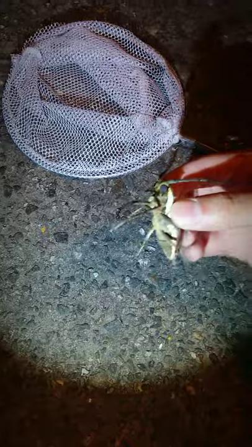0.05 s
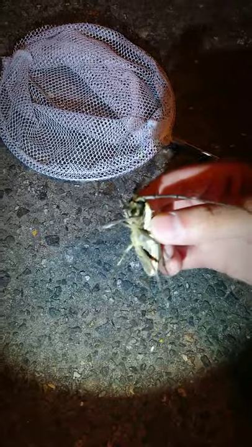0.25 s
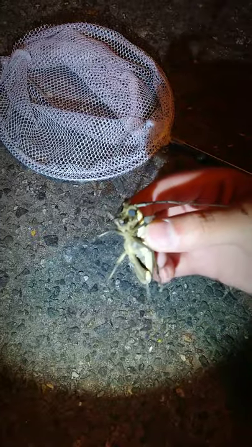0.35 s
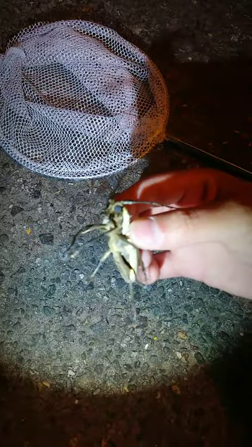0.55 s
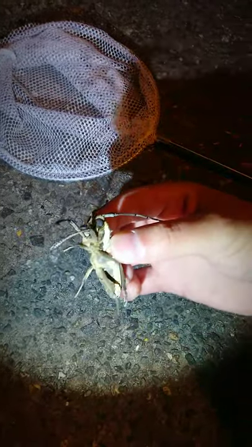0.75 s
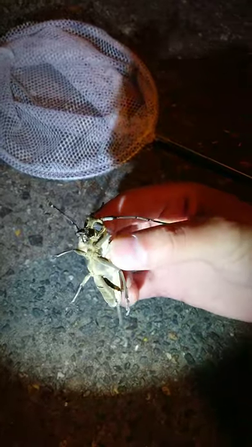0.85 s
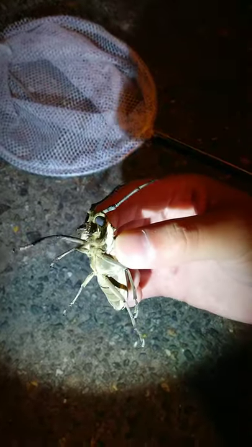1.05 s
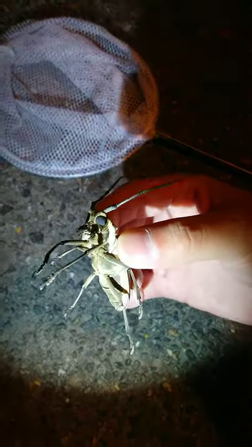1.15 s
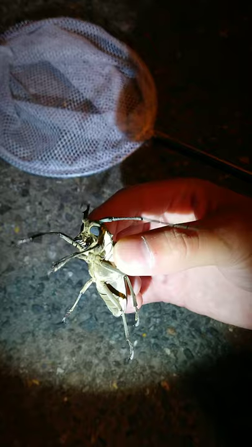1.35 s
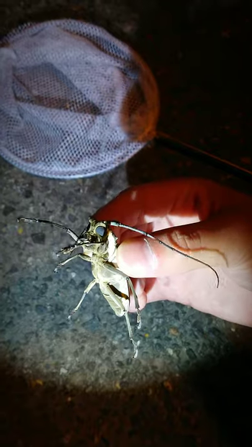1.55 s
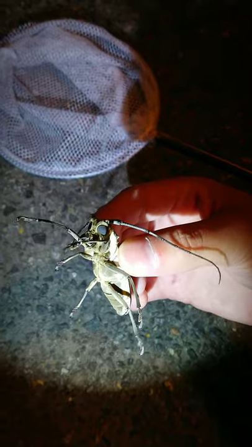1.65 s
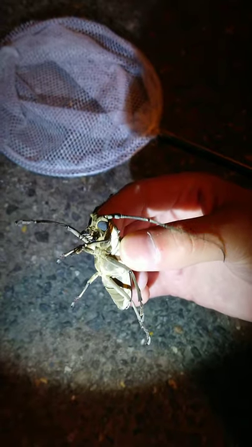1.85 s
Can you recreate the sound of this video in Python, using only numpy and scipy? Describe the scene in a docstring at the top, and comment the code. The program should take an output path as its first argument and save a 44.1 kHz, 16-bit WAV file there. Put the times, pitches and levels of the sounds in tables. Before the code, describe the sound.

A large hand-held beetle squeaks harshly close to the microphone. After soft handling bumps at the start, stuttering high chirps run from 0.1 to 0.5 seconds, then fuse into a rasp from 0.6 to 0.9. A quieter stutter follows from 1.0 to 1.4, a weaker rasp around 1.5, and a few faint ticks from 1.7 to 1.9. Low outdoor rumble and soft hiss continue throughout.

```python
"""A large beetle stridulates, held in the fingers close to a phone outdoors at night.
Its scraper sticks and slips over a ridged file: slow strokes stutter in separate chirping slips,
fast ones fuse into a rasp. Each slip rings the shell and echoes off the hand.
The phone is bumped softly over a low, steady background."""
import sys
import numpy as np
from scipy import signal
from scipy.fft import rfft, irfft
from scipy.io import wavfile
from scipy.ndimage import uniform_filter1d

SR = 44100
rng = np.random.default_rng(int(sys.argv[2]) if len(sys.argv) > 2 else 0)


def to_wav(sig):
    """Store sig (one row per channel, or 1-D mono) as 16-bit WAV at the path in sys.argv[1].

    Samples outside -1..1 are clipped; the rate is SR.
    """
    pcm = np.clip(np.atleast_2d(sig), -1, 1) * 32767
    pcm = np.round(pcm).astype(np.int16)
    wavfile.write(sys.argv[1], SR, pcm.T)  # frames by channels


N = 83790

# Slow-stroke slips: (time [s], level [dB], ridge rate [Hz], treble [dB], roughness [0-1])
SLOW_SLIPS = [(0.126, -18, 6800, -16.5, 0.13), (0.1568, -15.5, 6900, -9, 0.2),
              (0.184, -15, 6300, -5.5, 0.13), (0.2156, -11.5, 7500, 0, 0.27),
              (0.2347, -18.5, 3400, -12, 0.47), (0.256, -13.5, 7150, -1.5, 0.13),
              (0.302, -12, 7000, 6.5, 0.52), (0.316, -23, 3370, -8, 0.5), (0.344, -14, 7440, -5, 0.2),
              (0.376, -15, 8000, -5.5, 0.1), (0.3982, -13.5, 5660, 2, 0.6), (0.4167, -17, 5180, -7, 0.18),
              (0.4347, -15.5, 5300, -5, 0.16), (0.4479, -20, 3800, -15, 0.04),
              (0.4564, -20.5, 4480, -7, 0.13), (0.4676, -19, 5400, -5, 0.3),
              (0.4799, -19.5, 4160, -16, 0.27), (0.4928, -14.5, 5600, -1, 0.25),
              (0.5033, -20, 3400, -8, 0.36), (0.5151, -24, 3840, -17, 0.1), (0.537, -18.5, 5030, -7.5, 0.4),
              (1.0228, -29, 3350, -20, 0.56), (1.032, -22, 3350, -20, 0.25), (1.0403, -28, 3700, -18, 0.5),
              (1.057, -19.5, 3440, -3.5, 0.8), (1.0692, -22, 4220, -13, 0.23),
              (1.0876, -17, 4060, -9.5, 0.5), (1.0991, -20, 4400, -2, 0.3), (1.11, -20, 4440, -8, 0.17),
              (1.122, -20.5, 3650, -10, 0.45), (1.1447, -20, 4570, -7, 0.25), (1.1591, -25, 4000, -15, 0.6),
              (1.1841, -24.5, 3150, -17, 0.56), (1.198, -26.5, 4070, -7, 0.06),
              (1.203, -27, 5760, -11, 0.2), (1.2095, -24.5, 3120, -27, 0.6), (1.2192, -24, 3390, -4, 0.4),
              (1.226, -25, 4180, -17, 0.5), (1.2355, -20.5, 4200, -17, 0.86),
              (1.2467, -21.5, 3220, -4, 0.77), (1.2524, -24.5, 3900, -17, 0.6),
              (1.2638, -21.6, 4240, -13, 0.45), (1.2715, -22.5, 4350, -2, 0.37),
              (1.2764, -21, 4200, -10, 0.75), (1.282, -26, 3640, -13, 0.9), (1.288, -28.5, 5570, -25, 0.8),
              (1.305, -22.5, 3490, -8, 1), (1.317, -24, 4330, -9, 0.45), (1.3265, -24.5, 3200, -18, 0.7),
              (1.3357, -23.5, 3060, -7, 0.4), (1.344, -25, 3540, -16, 0.5), (1.351, -24.5, 5730, -4, 0.2),
              (1.355, -25.5, 2350, -19, 0.12), (1.3629, -28.5, 2290, -17, 0.05),
              (1.368, -32, 2240, -26, 0.6), (1.373, -29.5, 2340, -15, 0.16), (1.379, -31, 3060, -27, 0.6),
              (1.3585, -29, 2400, -18, 0.4), (1.384, -37, 2400, -26, 0.5), (1.6974, -39.5, 3220, -33, 0.5),
              (1.703, -44, 3300, -22, 0.8), (1.7088, -38.5, 2100, -31, 0.55), (1.8082, -36, 2500, -40, 0.6),
              (1.8152, -36, 2300, -42, 0.57), (1.8203, -35, 2280, -32, 0.5), (1.8288, -39, 2330, -37, 0.37),
              (1.839, -41, 2410, -31, 0.8), (1.8435, -43, 4100, -23, 0.5), (1.854, -36.5, 2150, -42, 0),
              (1.8922, -36, 2900, -42, 0.65)]
# Posture's effect on the shell, per stroke: (centre [Hz], width [Hz], gain [dB])
SLOW_POSTURES = [
    [(2050, 1320, -8), (3650, 350, 3), (4550, 280, -6), (6960, 410, -2.5), (10670, 620, -3.5),
     (13800, 630, 3), (16200, 600, 4)],
    [(1950, 250, -2), (2780, 69, -4), (3250, 200, 2), (4270, 230, 6), (6750, 1500, -2.5), (11100, 400, 3),
     (13400, 800, 2), (16000, 700, 6)],
]
def slow_strokes(slip_s=0.0015, gain_db=-1.36, second_stroke_s=1.0):
    """Two slow strokes of the scraper: each slip is a separate chirp."""
    strokes = np.zeros((2, 2, N))
    for time_s, level_db, ridge_hz, treble_db, roughness in SLOW_SLIPS:
        gain = amp(level_db + gain_db) * np.sqrt(SR * slip_s / 2)
        chirp = slip(slip_s, ridge_hz, treble_db, roughness, random_contact())
        add_slip(strokes[int(time_s > second_stroke_s)], time_s, gain * chirp)
    return sum(shell(stroke, posture) for stroke, posture in zip(strokes, SLOW_POSTURES))


# Scraper pace, per stroke: (time [s], slip rate [Hz])
FAST_RATES = [
    [(.577, 220), (.586, 376), (.61, 387), (.635, 450), (.70, 448), (.745, 478), (.80, 432), (.84, 357),
     (.88, 198)],
    [(1.487, 1170), (1.53, 1300), (1.543, 770), (1.556, 550), (1.58, 470), (1.60, 310), (1.62, 215),
     (1.64, 120)],
]
# Scraper pressure, per stroke: (time [s], level [dB], treble [dB], ridge rate [Hz])
FAST_PRESSURES = [
    [(.577, -37.5, -10.5, 5460), (.61, -33.5, -8, 5500), (.71, -33, -8.5, 4500), (.81, -36, -12.5, 3700),
     (.88, -46, -26, 3434)],
    [(1.487, -53.5, -22, 2400), (1.52, -43, -22, 3870), (1.572, -42, -15, 4140), (1.64, -52, -15, 3300)],
]
# Grain, per stroke: (gain [dB], treble offset [dB], roughness [0-1])
FAST_GRAINS = [(3.2, 7, 0.72), (3.2, -12.5, 0.81)]
# Posture's effect on the shell, per stroke: (centre [Hz], width [Hz], gain [dB])
FAST_POSTURES = [
    [(2030, 100, 4), (3480, 50, 5), (3610, 45, 5), (3820, 45, 6), (4450, 50, 5), (4980, 140, -4),
     (5450, 60, 4), (6020, 60, 5), (6500, 130, -6), (7080, 50, 4)],
    [(1500, 130, -4), (2350, 130, 5), (2720, 81, -2), (3130, 90, 4), (3700, 110, -7), (4120, 200, 6),
     (4620, 130, 6), (5050, 200, -4)],
]
def fast_stroke(rates, pressure, grain, posture, slip_s=0.00119, memory=0.62, spacing_jitter=0.018):
    """Similar slips crowd into a rasp at speed and part again as the scraper slows."""
    out = np.zeros((2, N))
    rate_times_s, rates_hz = np.transpose(rates)
    pressure_times_s, *curves = np.transpose(pressure)
    gain_db, treble_offset_db, roughness = grain
    time_s, contact = rate_times_s[0], random_contact()
    while time_s < rate_times_s[-1]:
        slip_hz = np.interp(time_s, rate_times_s, rates_hz)
        level_db, treble_db, ridge_hz = (np.interp(time_s, pressure_times_s, curve) for curve in curves)
        contact = memory * contact + np.sqrt(1 - memory ** 2) * random_contact()
        chirp = slip(slip_s, ridge_hz, treble_db + treble_offset_db, roughness, contact)
        add_slip(out, time_s, amp(level_db + gain_db) * np.sqrt(SR / slip_hz) * chirp)
        time_s += np.exp(spacing_jitter * rng.standard_normal()) / slip_hz
    return shell(out, posture)


def random_contact(ridges=20, size=2048):
    """Chance in one slip: how each ridge is met, then noise for the scatter."""
    return rng.standard_normal((2, ridges + size))


def slip(length_s, ridge_hz, treble_db, roughness, contact, ridges=20, size=2048):
    """The scraper jumps a few ridges, one tick each. Stereo, unit mean energy."""
    jitter, speed_up, flattening = 0.28, 0.064, 0.53
    shelf_hz, body_cutoff_hz = 7600, 1390  # so small a body radiates little bass
    hz = np.fft.rfftfreq(size, 1 / SR)
    timing_noise, force_noise = contact[:, :ridges]
    ridge_s = (np.arange(ridges) + 0.5) / ridge_hz
    progress = np.minimum(ridge_s / length_s, 1)
    struck = progress < 1
    force = np.sin(np.pi * progress ** 0.76) ** 2 * np.exp(0.85 * roughness * force_noise)
    tick_s = (ridge_s + jitter * roughness * timing_noise / ridge_hz) * (1 + speed_up * (1 - progress))
    ticks = force[struck] @ np.exp(-2j * np.pi * np.outer(abs(tick_s[struck]), hz))
    spectrum = ticks * (1 + scatter(contact[:, ridges:]))
    smooth_power = uniform_filter1d(abs(spectrum) ** 2, size=41, axis=1) + 1e-3
    shelf = amp(treble_db / (1 + (shelf_hz / (hz + 1)) ** 2.08))
    chirp = irfft(spectrum * shelf / smooth_power ** (flattening / 2))
    chirp = np.roll(chirp, size // 64, axis=1) * np.linspace(1, 0, size)
    chirp = signal.sosfilt(signal.butter(2, body_cutoff_hz, "high", fs=SR, output="sos"), chirp)
    return chirp / np.sqrt((chirp ** 2).sum() / 2 + 1e-20)


def scatter(noise, near_decay_s=0.0017, near_db=-0.5, far_decay_s=0.029, far_db=-26):
    """Spectrum of diffuse echoes: near in the shell and hand, far in the surroundings."""
    t = np.arange(noise.shape[1]) / SR
    near = amp(near_db) * unit_rms(np.exp(-t / near_decay_s))
    far = amp(far_db) * unit_rms(np.exp(-t / far_decay_s))
    return rfft(noise * (near + far) / np.sqrt(len(t)))


# Shell response at the microphones: (frequency [Hz], relative left [dB], relative right [dB])
SHELL_RESPONSE = [(300, -41, -55), (990, -24.5, -20), (1606, -28, -14), (2124, -30, -1.5),
                  (2420, -22, -4.5), (2790, -23, -8.5), (3210, -19, -3), (3670, -18, 0), (4155, -17, -2.5),
                  (4720, -6, -9.5), (4950, -12, -3.5), (5050, -9, -11.5), (5690, -2.5, -2),
                  (6200, -13.5, -9), (7230, -9.5, -0.5), (7900, -8.5, -6), (8400, -10, -16.5),
                  (9150, -22, -17.5), (9670, -9, -10), (10440, -7.5, -10), (11370, -3, -12),
                  (11580, -6, -22), (11800, -7.5, -13), (12340, -11.5, -9.5), (13040, 1, -6.5),
                  (13980, -4, -10.5), (14500, -12, -18), (15100, -11, -0.5), (15700, -23, -19),
                  (16500, -26, -24)]
def shell(x, posture, echo_s=0.0026, echo_db=-20.5, size=2048):
    """Shell resonances, lifted or damped by posture, plus the nearest reflection."""
    hz = abs(np.fft.fftfreq(size, 1 / SR))
    posture_db = sum(db * np.exp(-((hz - centre_hz) / width_hz) ** 2)
                     for centre_hz, width_hz, db in posture)
    gain = amp([spectrum_at(SHELL_RESPONSE, hz, column) + posture_db for column in (1, 2)])
    minimum_phase = np.exp(np.conj(signal.hilbert(np.log(gain))))
    ring = np.fft.ifft(minimum_phase).real[:, :size // 2]
    ring = ring + amp(echo_db) * np.roll(ring, round(echo_s * SR), axis=1)
    ring /= np.sqrt((ring ** 2).sum() / 2)
    return signal.oaconvolve(x, ring, axes=1)[:, :N]


# Bumps on the phone: (time [s], level [dB], frequency [Hz], decay [s])
PHONE_BUMPS = [(.043, -46.5, 170, .004), (0.054, -28, 125, 0.0034), (0.0609, -25, 121, 0.0016),
               (.0615, -38, 460, 0.0023), (0.0728, -31.5, 101, 0.0033), (0.0742, -41.5, 352, 0.0026),
               (.106, -28, 61.6, 0.0078), (0.164, -38, 88, 0.0055)]
def handling(rise_cycles=0.098, right_db=-34):
    """Fingers shift on the phone: dull thumps, mostly at the left microphone."""
    out, t = np.zeros(N), np.arange(SR // 10) / SR
    for time_s, level_db, hz, decay_s in PHONE_BUMPS:
        envelope = (1 - np.exp(-t * hz / rise_cycles)) * np.exp(-t / decay_s)
        add(out, time_s, 2 * amp(level_db) * envelope * np.sin(2 * np.pi * hz * t))
    return out * amp([[0], [right_db]])


# Air spectrum: (frequency [Hz], relative density [dB])
AIR_SPECTRUM = [(15, -28), (25, 3.5), (102, -2.5), (263, -10), (659, -16), (840, -12), (1040, -14),
                (1190, -13.5), (1650, -10), (2110, -10.5), (2990, -9), (3520, -9), (4610, -16.5),
                (6210, -23), (9070, -29.5), (14400, -28), (16000, -38)]
# Air balance: (frequency [Hz], left minus right [dB])
AIR_BALANCE = [(60, -9.5), (120, -7.5), (240, -13.5), (480, -5), (950, -7), (1890, -17.5), (3770, -11.5),
               (7520, -1.5), (15000, 1)]
# Air stereo likeness: (frequency [Hz], correlation [-1 to 1])
AIR_CORRELATION = [(60, 0.66), (240, 0.72), (950, 0.44), (3770, -0.099), (15000, -0.043)]
def night_air(level_db=-49.5, drift_db=2, size=1024):
    """Low rumble and soft hiss, drifting in patches of time and frequency."""
    hop, hz = size // 4, np.fft.rfftfreq(size, 1 / SR)
    left_re, left_im, other_re, other_im, drift = rng.standard_normal((N // hop + 5, len(hz), 5)).T
    drift = uniform_filter1d(drift, size=10, axis=0)
    drift = unit_rms(uniform_filter1d(drift, size=12, axis=1))
    correlation = spectrum_at(AIR_CORRELATION, hz)[:, None]
    left = left_re + 1j * left_im
    right = correlation * left + np.sqrt(1 - correlation ** 2) * (other_re + 1j * other_im)
    balance_db = spectrum_at(AIR_BALANCE, hz)[:, None]
    pan = amp([balance_db / 2, -balance_db / 2])
    gain = pan / pan.mean(0) * amp(spectrum_at(AIR_SPECTRUM, hz)[:, None] + drift_db * drift)
    air = signal.istft(gain * np.array([left, right]), nperseg=size, noverlap=size - hop)[1][:, :N]
    return amp(level_db) * air / air.mean(0).std()


def background(hum_hz=52, hum_db=-60.5, dip_at_s=0.089, dip_width_s=0.008, dip_db=-10):
    """Night air and a faint hum; the level dips once, briefly."""
    t = np.arange(N) / SR
    hum = amp(hum_db) * np.sqrt(2) * np.sin(2 * np.pi * hum_hz * t)
    dip = amp(dip_db * np.exp(-((t - dip_at_s) / dip_width_s) ** 2))
    return dip * (night_air() + hum)


def amp(db):
    """Decibels to gain."""
    return 10 ** (np.asarray(db) / 20)


def unit_rms(x):
    """Scales to an rms of one."""
    return x / np.sqrt(np.mean(x ** 2) + 1e-20)


def spectrum_at(points, hz, column=1):
    """Interpolates a table column over log frequency."""
    table = np.array(points, float)
    return np.interp(np.log(hz + 1), np.log(table[:, 0] + 1), table[:, column])


def add(mix, time_s, sound):
    """Mixes a sound in at time_s."""
    part = mix[max(round(time_s * SR), 0):][:len(sound)]
    part += sound[:len(part)]


def add_slip(mix, peak_s, chirp, left_lead_s=0.0017, right_lead_s=0.0014):
    """Starts a slip ahead of its peak, left channel first."""
    add(mix[0], peak_s - left_lead_s, chirp[0])
    add(mix[1], peak_s - right_lead_s, chirp[1])


def scene():
    """Two slow and two fast strokes over phone bumps and the background."""
    fast = zip(FAST_RATES, FAST_PRESSURES, FAST_GRAINS, FAST_POSTURES)
    return background() + handling() + slow_strokes() + sum(fast_stroke(*stroke) for stroke in fast)


def record(dry, low_cut_hz=47.7, band_limit_hz=16400):
    """The phone's low cut and band limit."""
    dry = signal.sosfilt(signal.butter(4, low_cut_hz, "high", fs=SR, output="sos"), dry)
    lowpass = signal.firwin(255, band_limit_hz, window=("kaiser", 8), fs=SR)
    return signal.oaconvolve(dry, lowpass[None], "same")


dry = scene()
out = record(dry)
to_wav(out)
```